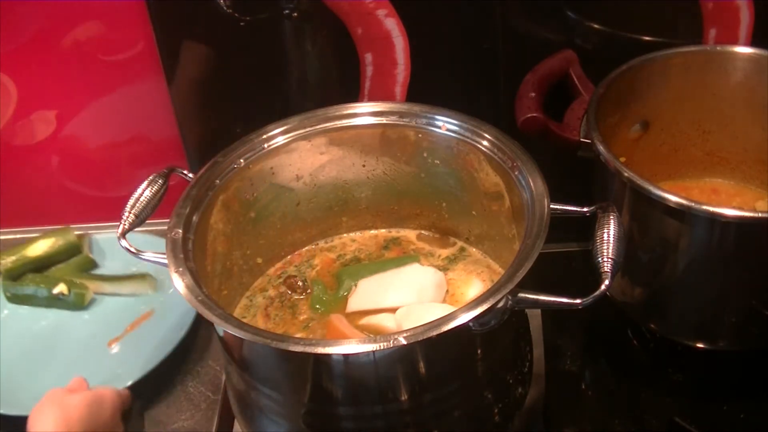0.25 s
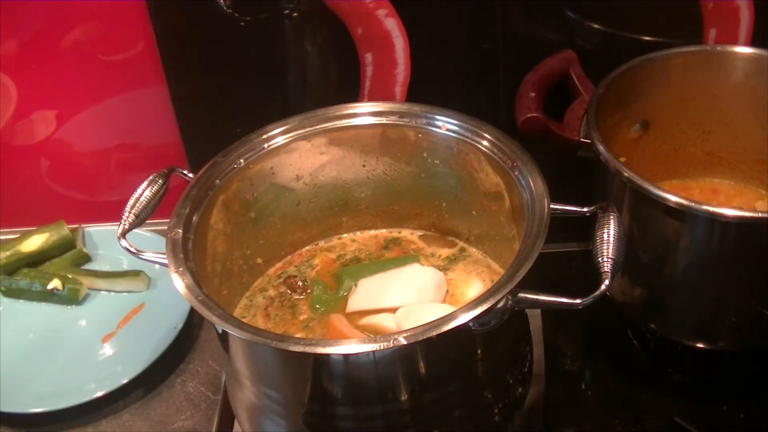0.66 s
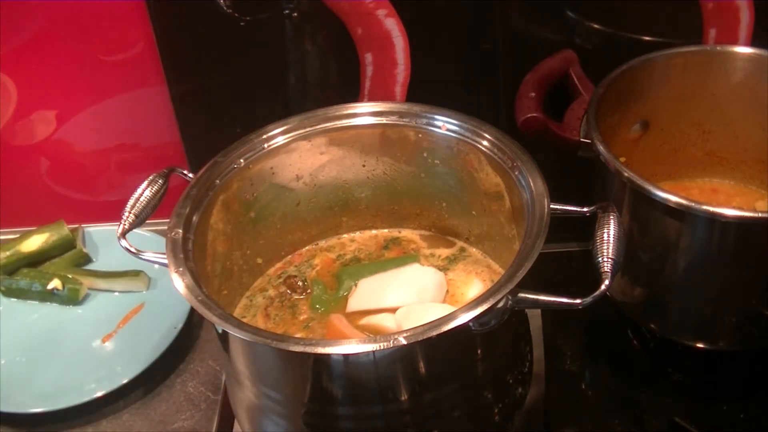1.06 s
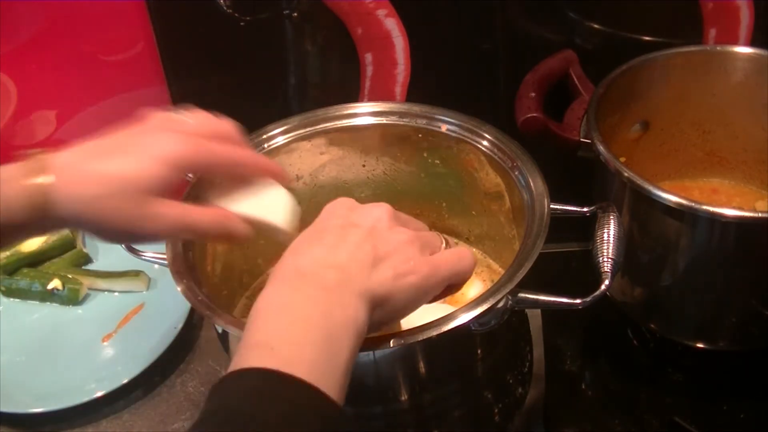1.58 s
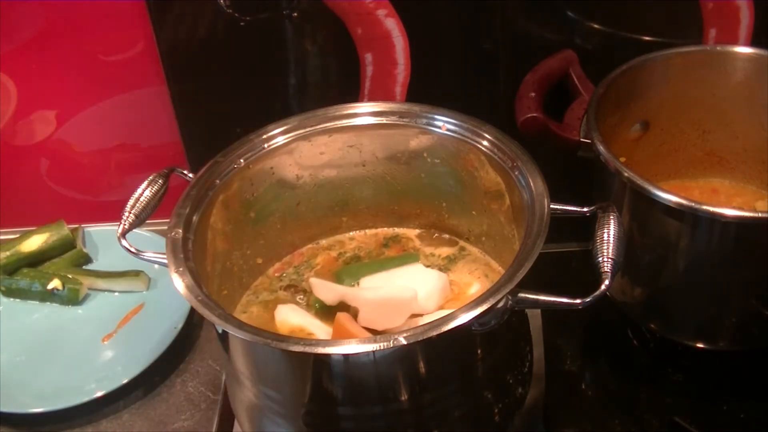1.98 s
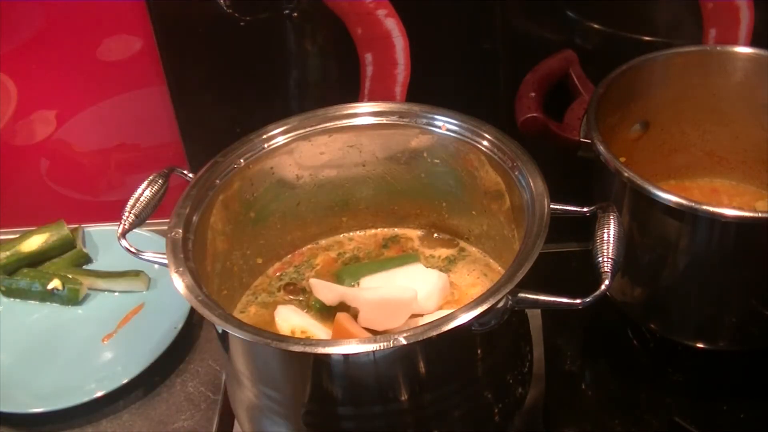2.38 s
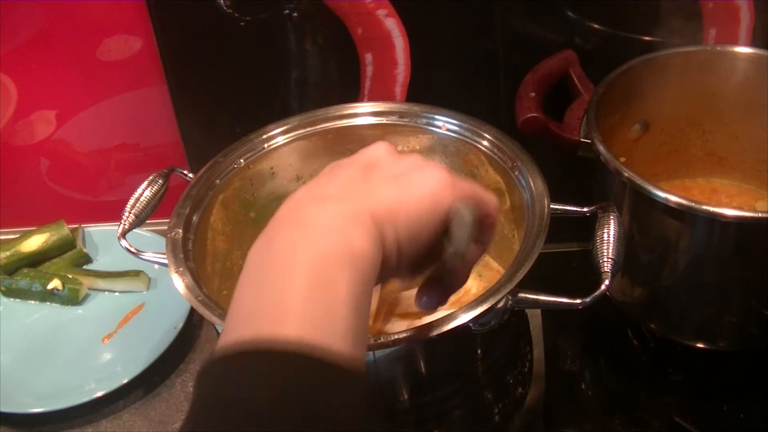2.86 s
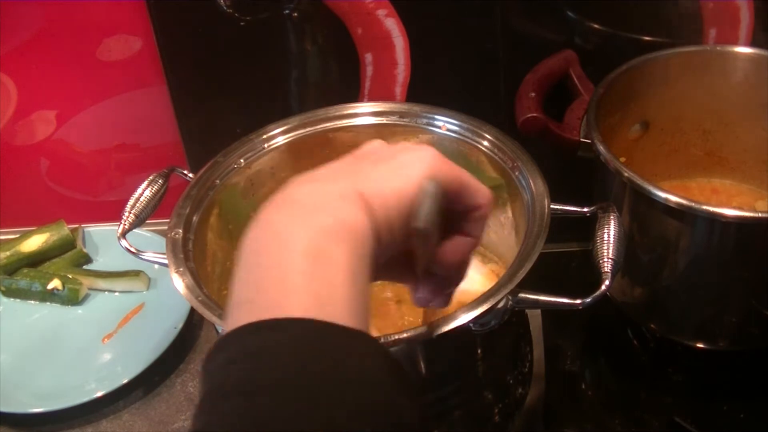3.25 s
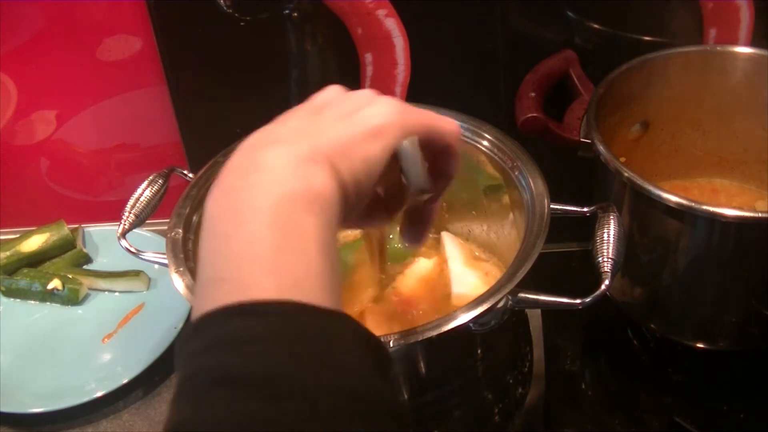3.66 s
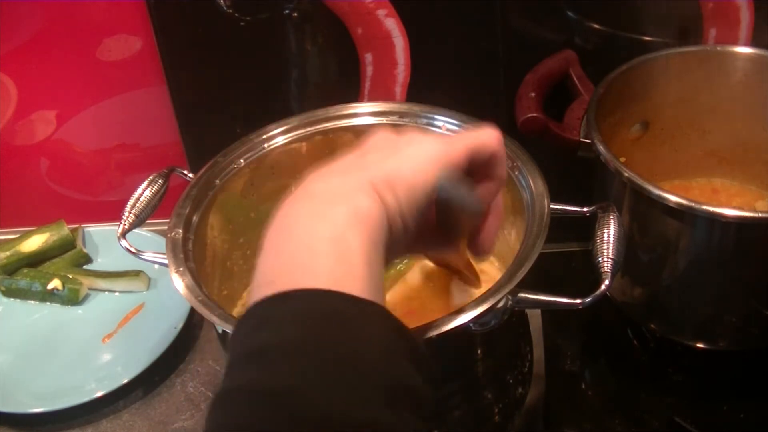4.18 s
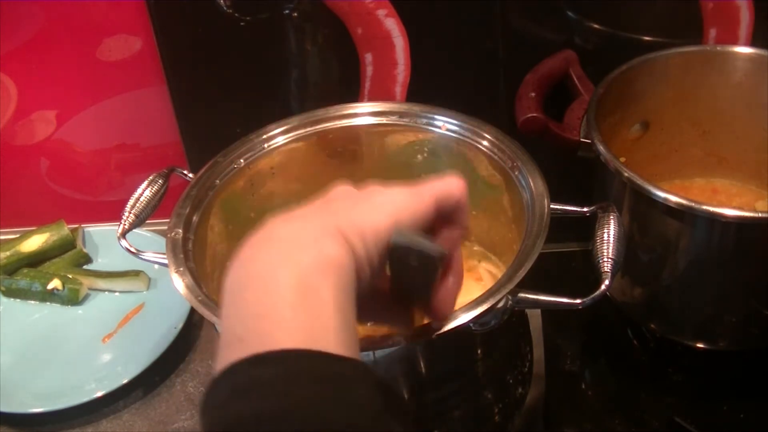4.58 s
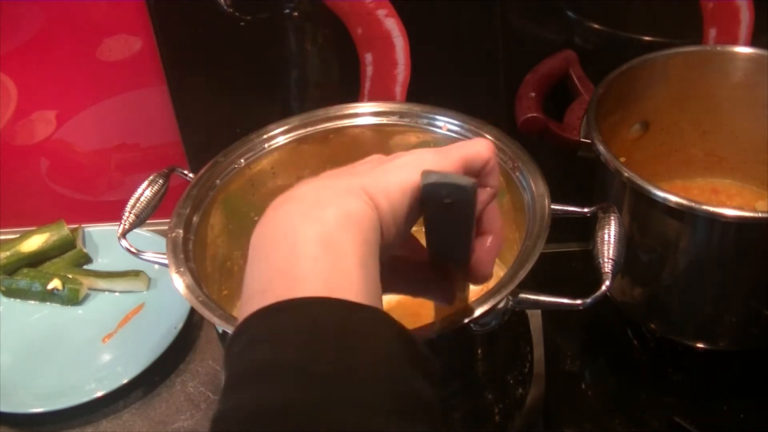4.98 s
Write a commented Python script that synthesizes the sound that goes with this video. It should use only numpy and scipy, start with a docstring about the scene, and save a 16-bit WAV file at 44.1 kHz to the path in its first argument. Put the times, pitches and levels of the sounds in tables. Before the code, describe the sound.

Broth simmers with a soft hiss as a plate clatters down, a spatula rattles, and stirring brings wet squelches and dull pot bumps.

```python
"""A kitchen, with a stereo microphone close to a steel pot of broth; tiny bubbles ring the pot throughout.
At once a plate lands on the counter, rocks, is shoved along and lands again. Vegetables drop into the
broth with a dull bump, and just after two seconds a spatula clatters as it is picked up. It stirs to the
end: wet squelches, bubble pops and bumps, while pushes on the pot set the hob droning over the room tone."""
import sys
import numpy as np
from scipy import signal
from scipy.fft import rfft, irfft
from scipy.io import wavfile
from scipy.ndimage import uniform_filter1d

SR = 44100
rng = np.random.default_rng(int(sys.argv[2]) if len(sys.argv) > 2 else 0)


def digitize_waveform(pressure):
    """Quantize a signal to 16-bit integers and store it at the path in sys.argv[1].

    Rows of a 2-D input are taken as channels; values are limited to [-1, 1].
    """
    field = np.atleast_2d(pressure).T
    bounded = np.clip(field, -1, 1)
    quanta = np.round(bounded * 32767).astype(np.int16)
    wavfile.write(sys.argv[1], SR, quanta)


N = 230552
T = np.arange(N) / SR
HZ = np.fft.rfftfreq(8192, 1 / SR)

# scattered sound that reaches the two microphone ports unalike: frequency_hz, side_gain
SIDE_SHARE = [(100, 0.77), (350, 0.041), (1400, 0.33), (3200, .22), (7000, 0.5), (15000, 0.76)]


def simmer(hiss_db=-1, fizz_db=-5, level_db=-41.0, flutter_db=1.0, swell_db=0.58):
    """Tiny steam bubbles collapse on the hot base, others burst at the surface; all ring the pot."""
    # broad colour of the simmer: frequency_hz, level_db
    sizzle = [(150, -23.5), (300, -44), (650, -11.5), (1400, -13.5), (2700, -16), (4200, -12.5),
              (6300, -15.5), (8400, -18), (10000, -23.5), (11300, -30.5), (13000, -29.5), (15700, -30.5)]
    # resonances of the pot's air and wall: pitch_hz, width_hz, level_db
    pot_modes = [(368, 25, -1.1), (422, 38, -2.6), (482, 33, -3.0), (833, 31, -9.3), (986, 49, -6.2),
                 (1044, 48, -3.0), (1106, 94, -1.1), (1506, 40, -6.3), (1722, 37, -2.8), (1830, 39, -6.2),
                 (1940, 166, -5.7), (2295, 213, -7.3), (3350, 144, -5.8), (3517, 261, -8.1),
                 (4702, 116, -12.3), (5078, 326, -10.2), (7466, 305, -14.7), (14813, 720, -24.9)]
    # the stirring arm lies over the pot and shades it: time_s, level_db
    arm_shade = [(2.4, 0), (3.0, -0.5)]
    body = ring(np.hypot(gain_of(hiss_db + read(sizzle, HZ)), resonances(pot_modes)))
    t = np.arange(256) / SR
    fizz = 0
    for hz in np.linspace(1600, 15000, num=20):  # each surface bubble has a pitch of its own
        age = t * hz / 1.04
        ping = age * np.exp(-age) * np.sin(2 * np.pi * hz * t)
        fizz = fizz + evened(through(clicks(per_s=160, spread_db=2.9), ping))
    collapse = clicks(per_s=9000, spread_db=1.5)
    mid = evened(collapse + gain_of(fizz_db) * evened(fizz)[0])
    scattered = clicks(per_s=12000, spread_db=3.0)
    side = irfft(rfft(scattered) * read(SIDE_SHARE, np.fft.rfftfreq(N, 1 / SR)), N)
    swell = gain_of(level_db + flutter_db * wander(rate_hz=32) + swell_db * wander(rate_hz=2.3))
    shade = gain_of(np.interp(T, *np.transpose(arm_shade)))
    return through([mid, side], body) * swell * shade


def plate(counter_db=-1, knock_db=1, damping_hz=16, radiate_hz=3200, lowest_hz=150, highest_hz=6000):
    """The plate lands on its foot ring, rattles, scrapes along the counter and drops flat."""
    # broad colour of the plate on the counter: frequency_hz, level_db
    counter = [(80, -52.9), (150, -39), (270, -32), (400, -3), (1000, -4), (2400, -9.5), (3600, -14.5),
               (5000, -40), (7000, -21.5), (12000, -74)]
    # the plate's free modes: pitch_hz, width_hz, level_db
    modes = [(196, 7.4, -8.5), (314, 5.9, -3.5), (352, 12, 1.5), (477, 8.4, 0.5), (540, 7.7, -2.5),
             (580, 8.7, -13), (640, 10, -21), (714, 8.2, -2), (793, 11, 0.5), (790, 8.6, -8), (952, 52, 3),
             (1058, 16, -13), (1100, 9.7, -4), (1300, 9.9, -6), (1420, 17, -4), (1606, 37, -1.5),
             (1860, 11, -27), (1830, 16, -7), (2020, 25, 2), (2230, 120, -3.5), (2526, 19, -8),
             (3264, 38, -4.5), (3840, 68, -11.5), (4540, 155, -11), (5150, 20, -11)]
    # it meets the counter: start_s, level_db, hardness_hz, chatter_s
    landings = [(0.0062, 14.5, 5700, 0.00093), (0.398, 9.5, 2200, 0.0049), (0.4058, 10.5, 5540, 0.0037),
                (0.4085, 16, 1100, 0.002994)]
    # shoves along the counter: start_s, length_s, level_db
    shoves = [(0.08, 0.19, -38), (0.27, 0.061, -35.5), (0.36, 0.027, -33)]
    # modes woken by the rubbing: pitch_hz, width_hz, level_db
    rub_modes = [(299, 13.3, 3), (380, 28, 3.5), (500, 16, -21), (612, 43, -2.5), (654, 18, -6),
                 (1010, 240, -10.5), (1310, 23, -4.5), (2070, 75, -2.5), (3030, 300, -9.5),
                 (3440, 160, -11.5)]
    held = [(hz, width + damping_hz, db) for hz, width, db in modes]  # hand and food damp every mode
    # it radiates better with rising pitch, but is too small for bass and too thick for the top treble
    radiation = np.hypot(1, HZ / radiate_hz)
    radiation /= np.hypot(1, (lowest_hz / (HZ + 1)) ** 3) * np.hypot(1, (HZ / highest_hz) ** 3)
    body = ring(np.hypot(gain_of(counter_db + read(counter, HZ)), resonances(held)) * radiation)
    knocks = gain_of(knock_db) * through(blows(landings + rocking()), body)
    friction = clicks(per_s=1700, spread_db=1.5) * gestures(shoves, attack_s=0.03, release_s=0.032)
    scrape = through(friction, ring(resonances(rub_modes)))
    return placed(knocks + scrape, near_db=0.5, room_db=-6, near_stretch=0.24)


def rocking(gap_s=0.014, hardness_hz=2900, dulling=0.86, chatter_s=0.0045, count=5):
    """Evenly spaced blows of the rocking plate, each weaker and duller than the last."""
    # rocking on the foot ring after each landing: start_s, level_db, fade_db_per_s
    rocks = [(0.0114, 11.5, 95), (0.414, 11, 270)]
    return [(s + k * gap_s, db - fade * k * gap_s, hardness_hz * dulling ** k, chatter_s)
            for s, db, fade in rocks for k in range(count)]


def spatula():
    """The spatula drags faintly on the counter and clatters as it lifts."""
    # its resonances: pitch_hz, width_hz, level_db
    modes = [(486, 42, 1), (585, 17, 2), (698, 40, -0.5), (811, 18, -8), (1010, 160, -1.5), (1476, 94, 3.5),
             (1740, 48, -10), (1860, 110, -1), (2120, 120, -2.5), (2420, 170, 1), (2620, 33, -2.0),
             (2840, 75, -0.5), (4200, 130, -17), (4420, 22, 3), (5170, 173, -23.0)]
    # the drag: start_s, length_s, level_db
    drags = [(2.11, 0.086, -42.5)]
    # the clatter: start_s, level_db, hardness_hz, chatter_s
    knocks = [(2.1918, 3, 9000, 0.0024), (2.197, 1.5, 6000, .003), (2.2205, -1, 2500, 0.0016),
              (2.249, -3.5, 2600, 0.0043), (2.255, -1.5, 1800, .004), (2.288, 0.5, 1200, .008)]
    friction = clicks(per_s=1300, spread_db=4.0) * gestures(drags, attack_s=0.018, release_s=0.006)
    clatter = through(blows(knocks) + friction, ring(resonances(modes)))
    return placed(clatter, near_db=-5.5, room_db=-2.5, near_stretch=0.11)


def pot_bumps():
    """Vegetables and spatula bump the pot, damped by the broth."""
    # the filled pot's resonances: pitch_hz, width_hz, level_db
    modes = [(146, 44, -13.5), (370, 50, 1), (500, 20, 2.5), (785, 350, -6), (1027, 5.1, 4), (1125, 8.7, 7),
             (1354, 19, -6), (1604, 80, 1.5), (1810, 75, -5.5), (2230, 31, -2), (2750, 44, -1)]
    # bumps against it: start_s, level_db, hardness_hz, chatter_s
    bumps = [(1.772, -3, 500, 0.0076), (2.889, -5.5, 900, 0.00502), (3.274, -8, 1200, 0.005),
             (3.495, -1.5, 600, 0.0086), (4.843, 0.5, 2820, 0.00157), (4.881, 0, 900, 0.0048),
             (5.022, -1, 700, 0.0066)]
    thuds = through(blows(bumps), ring(resonances(modes)))
    return placed(thuds, near_db=-5, room_db=3.5, near_stretch=0.067)


def pops(rise=0.017, pop_db=-1, lowest_hz=320, swell_s=0.00049, reference_hz=2000, size_law=0.87):
    """Single bubbles burst with a brief rising note that bounces round inside the pot."""
    # the broth's largest bubbles: start_s, level_db, pitch_hz
    large_bubbles = [(1.0157, -28.5, 2060), (1.402, -27.5, 1660), (1.768, -29, 468), (2.878, -28, 950),
                     (3.1375, -24.5, 2460), (3.7198, -25.5, 2180), (3.7468, -25, 2300),
                     (3.8588, -16.5, 2680), (3.9776, -23.5, 2260), (4.0525, -26.5, 4870),
                     (4.1755, -25.5, 2190), (4.6182, -22.5, 3600)]
    notes, t = np.zeros(N), np.arange(3000) / SR
    for s, db, hz in large_bubbles + small_bubbles():
        age = t / swell_s * (hz / reference_hz) ** size_law  # bigger, lower bubbles peak later
        tone = np.sin(2 * np.pi * hz * t * (1 + rise * np.tanh(age / 2)))
        add(notes, s, gain_of(db + pop_db) * age * np.exp(1 - age) * tone)
    # so small a source radiates no bass
    notes = signal.sosfilt(signal.butter(2, lowest_hz, "high", fs=SR, output="sos"), notes)
    return placed(notes, near_db=-2, room_db=-9, near_stretch=0.13)


def small_bubbles(quietest_db=-34, loudest_db=-28, low_hz=1300, high_hz=5500, candidates=60):
    """Smaller bubbles burst at random, more often in stirred broth: start_s, level_db, pitch_hz."""
    stir_from_s, stir_to_s = 2.2, 4.8
    when, chance, size, pitch = rng.random((candidates, 4)).T
    start_s = when * N / SR
    per_s = np.where((start_s > stir_from_s) & (start_s < stir_to_s), 7.0, 2.0)
    level_db = quietest_db + (loudest_db - quietest_db) * size
    rows = np.transpose([start_s, level_db, low_hz * (high_hz / low_hz) ** pitch])
    return list(rows[chance < per_s * N / SR / candidates])


def squelch():
    """Wet films tear in a fine crackle as the spatula moves."""
    # strokes through the wet vegetables: start_s, length_s, level_db
    strokes = [(2.85, 0.054, -45), (3.27, 0.021, -43), (3.7, 0.033, -40.5), (3.83, 0.027, -39.5),
               (4.15, 0.046, -44.5), (4.59, 0.05, -50), (5.14, 0.083, -46)]
    # colour of the crackle: frequency_hz, level_db
    colour = [(300, -18), (1000, 8), (2200, 10.5), (3600, 10), (6000, 4), (9000, -4), (16000, -13)]
    tearing = clicks(per_s=2300, spread_db=2.5) * gestures(strokes, attack_s=0.011, release_s=0.021)
    crackle = through(tearing, ring(gain_of(read(colour, HZ))))
    return placed(crackle, near_db=1, room_db=-12, near_stretch=0.18)


def hob(pitch_hz=56, rest_db=-75, waver_rad=0.68, throb_db=2):
    """The hob's lowest mode, faint under the simmer and shaken by pushes on the pot; mid only."""
    # pushes on the pot: start_s, length_s, level_db
    pushes = [(1.75, 0.054, -53.5), (2.89, 0.11, -64.5), (3.39, 0.23, -57), (4.86, 0.071, -53),
              (5.01, 0.23, -59)]
    phase = 2 * np.pi * pitch_hz * T + waver_rad * wander(rate_hz=5.2)
    drone = evened(np.sin(phase) * gain_of(throb_db * wander(rate_hz=11)))
    shake = gain_of(rest_db) + gestures(pushes, attack_s=0.019, release_s=0.14)
    return np.array([shake * drone, np.zeros(N)])


def room_tone(mid_db=-57, side_db=-60):
    """Soft, steady kitchen air behind everything."""
    # colour of the air: frequency_hz, level_db
    colour = [(20, 5), (55, -8), (90, 1), (140, -3), (200, 8.5), (260, 1), (500, 2.5), (2000, 4.5),
              (16000, -30)]
    air = through(rng.standard_normal((2, N)), ring(gain_of(read(colour, HZ))))
    return air * gain_of([[mid_db], [side_db]])


def placed(x, near_db, room_db, near_stretch, smooth_bins=5):
    """Direct sound, quick reflections from close surfaces, and the kitchen; returns mid and side."""
    mid, side = (gain_of(near_db) * echoes(near_stretch) + gain_of(room_db) * echoes(0.99)
                 for _ in range(2))
    mid[0] += 1  # the direct path
    # the reflections spread a sound in time but leave its broad colour alone
    colour = np.sqrt(uniform_filter1d(abs(rfft(mid, 2 * (len(HZ) - 1))) ** 2, smooth_bins))
    mid = signal.fftconvolve(mid, ring(1 / colour))[:len(side)]
    side_filter = np.fft.fftshift(irfft(read(SIDE_SHARE, HZ)))
    side = signal.fftconvolve(side, side_filter, "same") / np.linalg.norm(side)
    return through(x, [mid / np.linalg.norm(mid), side])


def echoes(stretch):
    """Sparse reflections of energy 1; each band dies in the kitchen's decay time times stretch."""
    # the kitchen's decay: frequency_hz, t60_s
    decay = [(150, 0.46), (500, 0.33), (1500, 0.36), (4000, 0.37), (12000, 0.18)]
    taps = rng.choice([-1., 1.], SR // 2) * (rng.random(SR // 2) < 0.12)
    hz, t, bands = signal.stft(taps, SR, nperseg=128)
    fade = np.exp(-np.log(1000) * t / (stretch * read(decay, hz)[:, None]))
    tail = signal.istft(bands * fade, SR)[1]
    return tail / np.linalg.norm(tail)


def blows(rows, smooth_bins=40):
    """Force pulses: a soft contact is dull; a rough one chatters, its pitches scattered in time."""
    force = np.zeros(N)
    for s, db, hardness_hz, chatter_s in rows:
        delay_s = chatter_s * abs(evened(uniform_filter1d(rng.standard_normal(len(HZ)), smooth_bins)))
        spectrum = np.exp(-2j * np.pi * np.cumsum(delay_s) * HZ[1]) / (1 + 1j * HZ / hardness_hz) ** 2
        add(force, s, gain_of(db) * irfft(spectrum)[:len(HZ)])
    return force


def gestures(rows, attack_s, release_s):
    """Gain of hand movements: each builds up, holds until its length is over and dies away."""
    return sum(gain_of(db) * np.clip((T - s) / attack_s, 0, 1)
               * np.exp(-np.maximum(T - s - length_s, 0) / release_s) for s, length_s, db in rows)


def clicks(per_s, spread_db):
    """Random impulses of rms 1: many small, a few large."""
    size = gain_of(spread_db * np.minimum(rng.exponential(1, N), 5))
    return evened(size * rng.choice([-1, 1], N) * (rng.random(N) < per_s / SR))


def wander(rate_hz):
    """Slow random drift of rms 1."""
    hz = np.fft.rfftfreq(N, 1 / SR)
    return evened(irfft(rfft(rng.standard_normal(N)) / (1 + (hz / rate_hz) ** 2), N))


def resonances(modes):
    """Magnitude spectrum of a set of damped modes."""
    return np.sqrt(sum(gain_of(db) ** 2 / (1 + ((HZ ** 2 - hz ** 2) / (width * HZ + 1)) ** 2)
                       for hz, width, db in modes))


def ring(magnitude):
    """The causal impulse response, of energy 1, with this spectral shape."""
    log_gain = np.log(np.maximum(magnitude / magnitude.max(), 1e-5))
    mirrored = np.concatenate([log_gain, log_gain[-2:0:-1]])
    response = np.fft.ifft(np.exp(np.conj(signal.hilbert(mirrored)))).real[:len(HZ)]
    return response / np.linalg.norm(response)


def through(x, response):
    """Convolution, cut to the scene's length."""
    return signal.fftconvolve(np.atleast_2d(x), np.atleast_2d(response), axes=1)[:, :N]


def add(mix, s, sound):
    """Mixes a sound in at time s."""
    part = mix[max(round(s * SR), 0):][:len(sound)]
    part += sound[:len(part)]


def read(points, hz):
    """Interpolates a table on a log-frequency axis."""
    table_hz, value = np.transpose(points)
    return np.interp(np.log(hz + 1), np.log(table_hz + 1), value)


def evened(x):
    """Scaled to rms 1."""
    return x / np.sqrt(np.mean(x ** 2) + 1e-20)


def gain_of(db):
    """Decibels to amplitude."""
    return 10 ** (np.asarray(db) / 20)


def scene():
    """The kitchen from beside the pot: all sources as mid and side, then left and right."""
    mid, side = simmer() + plate() + spatula() + pot_bumps() + pops() + squelch() + hob() + room_tone()
    return np.array([mid + side, mid - side])


def record(dry, edge_hz=15850):
    """Each microphone port has its own colour and phase; then full scale and the band limit."""
    # balance between the ports: frequency_hz, left_minus_right_db
    balance = [(60, 3.5), (200, 4.5), (380, 7.5), (700, 8), (1290, 6), (2400, 1.3), (4400, 0), (5600, .5),
               (7500, 8), (8600, 3.5), (9900, -4.5), (11000, 1.5), (15000, 1.5)]
    # phase between the ports: frequency_hz, left_lead_rad
    phase = [(50, 0), (600, -.2), (1700, -.6), (3300, 0), (6500, 0), (8000, -1.3), (9800, -1.5), (11000, 0),
             (15000, -.3)]
    lean = gain_of(read(balance, HZ) / 2) * np.exp(1j * read(phase, HZ) / 2)
    ports = np.array([lean, 1 / lean]) * 2 / abs(lean + 1 / lean)
    responses = np.fft.fftshift(irfft(ports), axes=1)[:, 1:]
    heard = signal.fftconvolve(dry, responses, "same", axes=1)
    low_pass = signal.firwin(511, edge_hz, window=("kaiser", 9), fs=SR)
    return signal.oaconvolve(np.clip(heard, -1, 1), low_pass[None], "same")


dry = scene()
out = record(dry)
digitize_waveform(out)
```